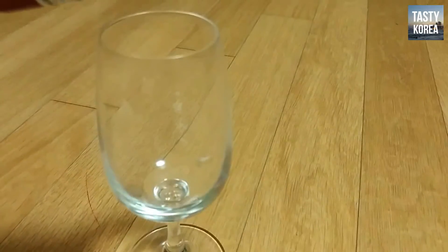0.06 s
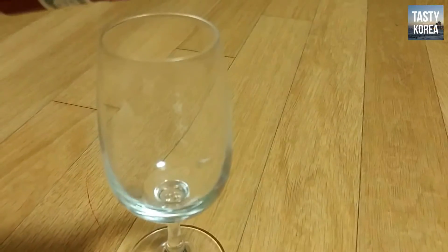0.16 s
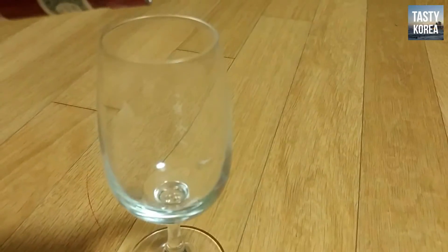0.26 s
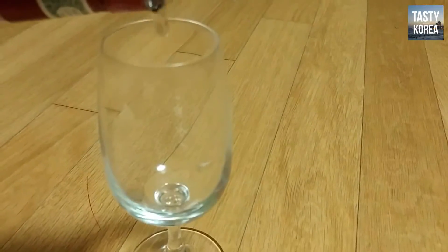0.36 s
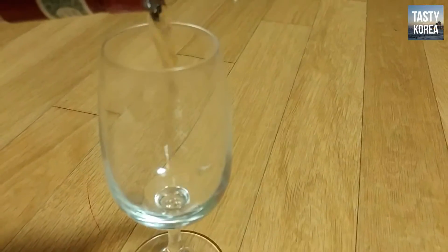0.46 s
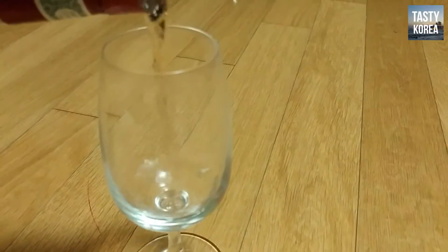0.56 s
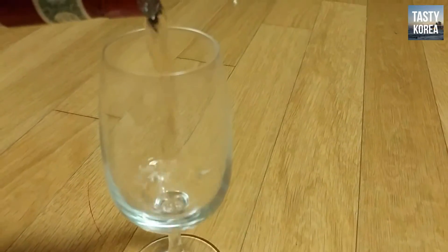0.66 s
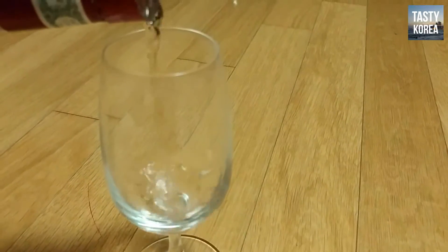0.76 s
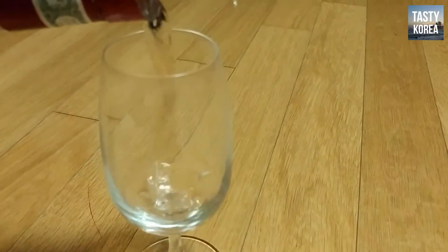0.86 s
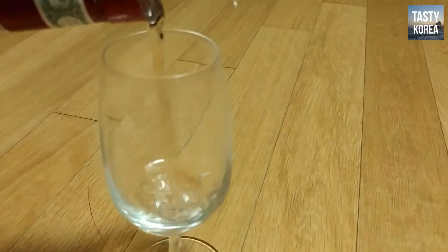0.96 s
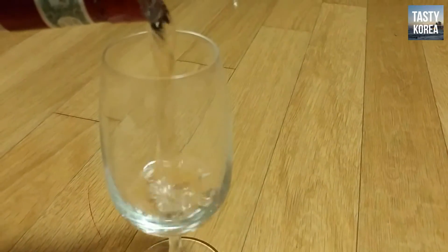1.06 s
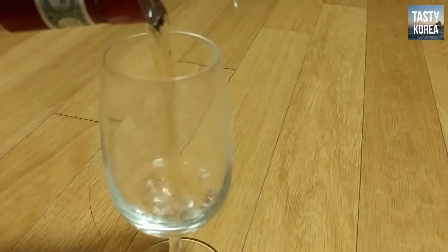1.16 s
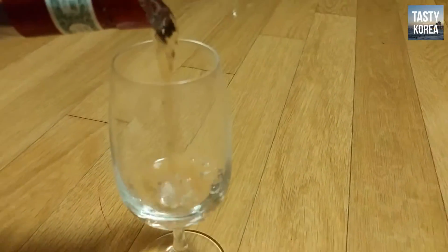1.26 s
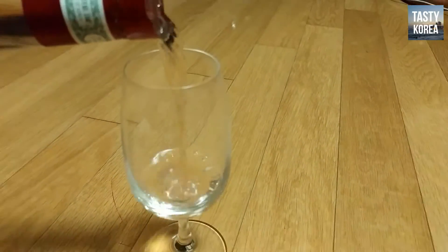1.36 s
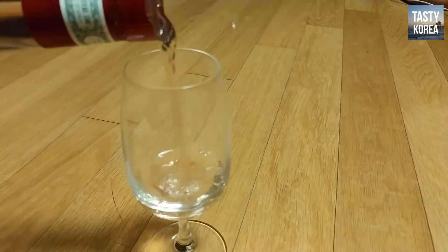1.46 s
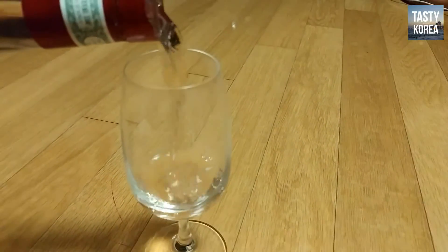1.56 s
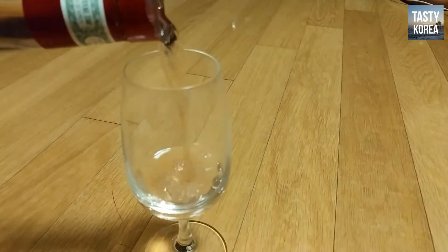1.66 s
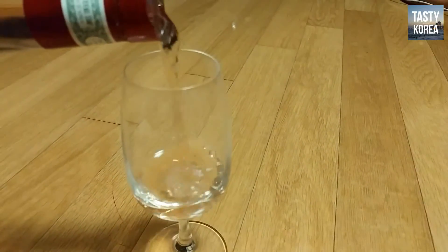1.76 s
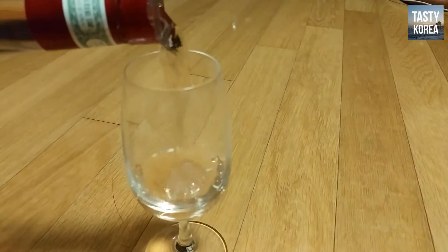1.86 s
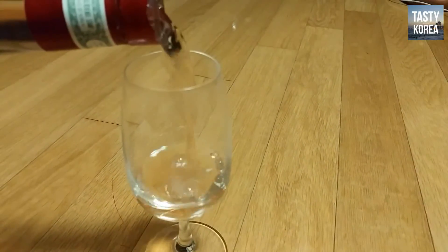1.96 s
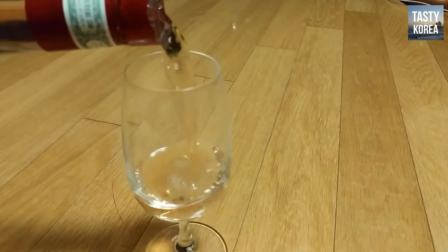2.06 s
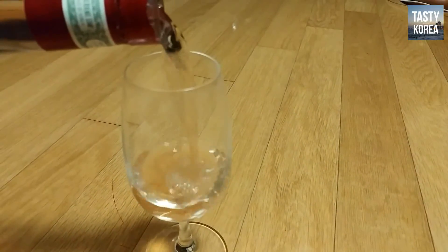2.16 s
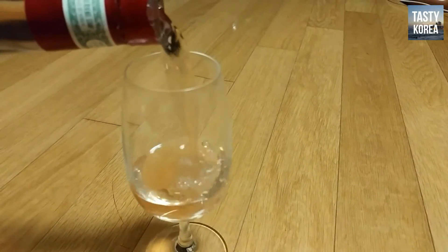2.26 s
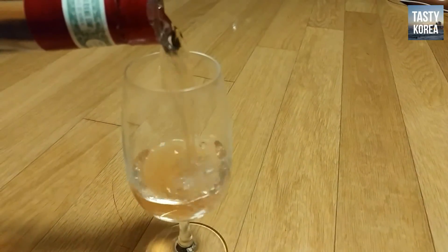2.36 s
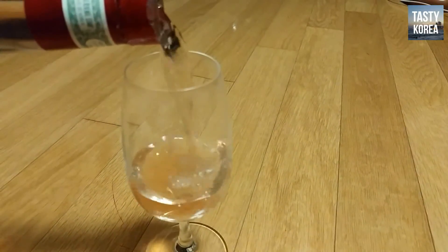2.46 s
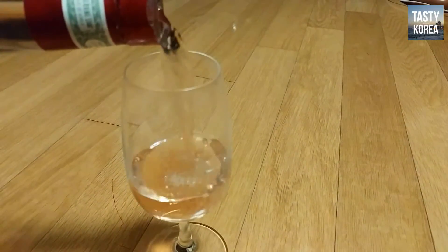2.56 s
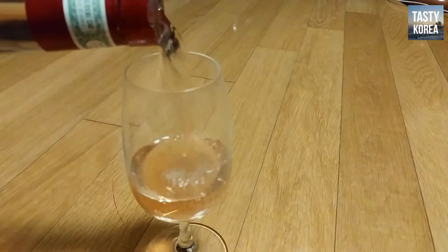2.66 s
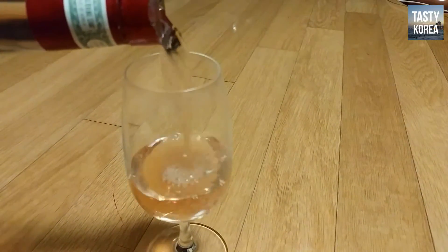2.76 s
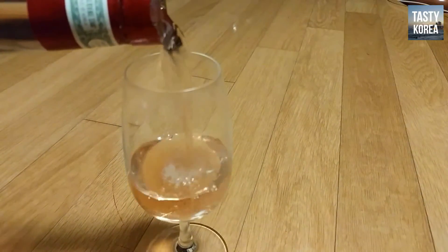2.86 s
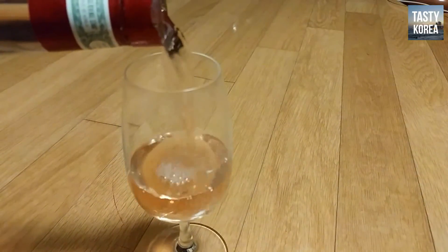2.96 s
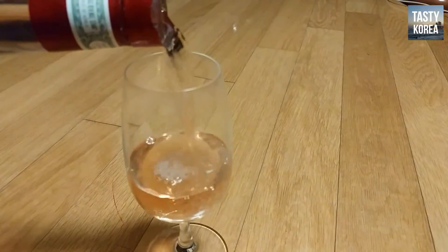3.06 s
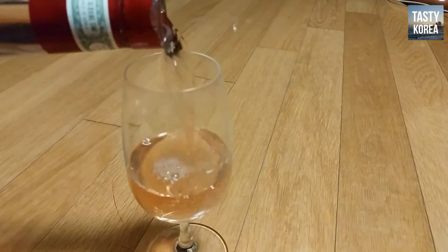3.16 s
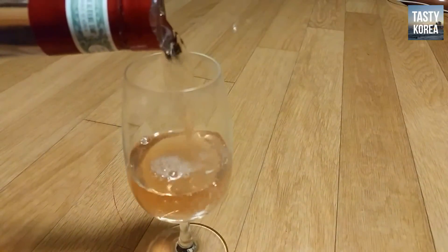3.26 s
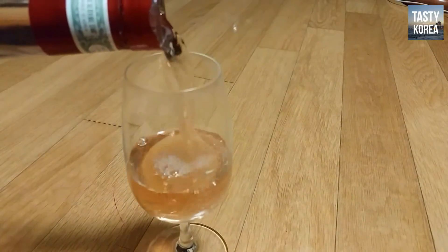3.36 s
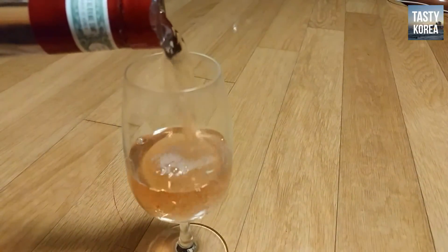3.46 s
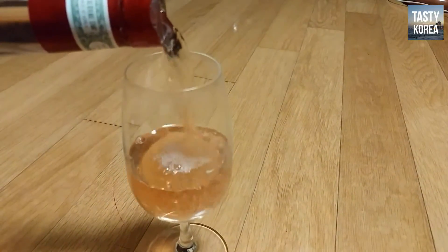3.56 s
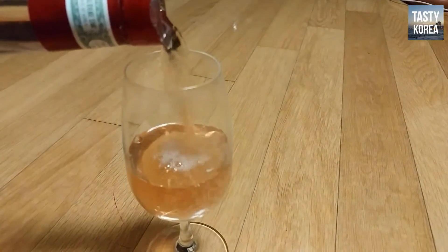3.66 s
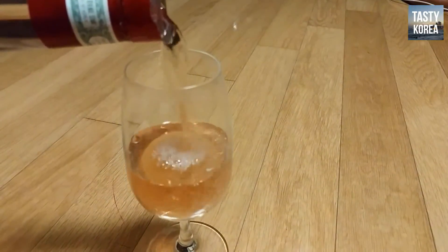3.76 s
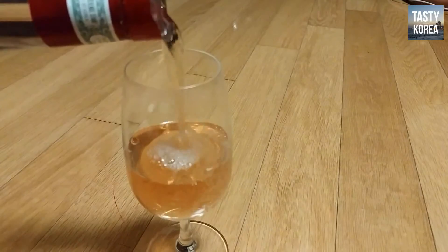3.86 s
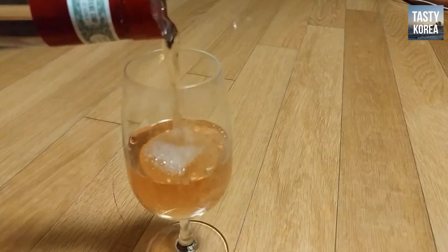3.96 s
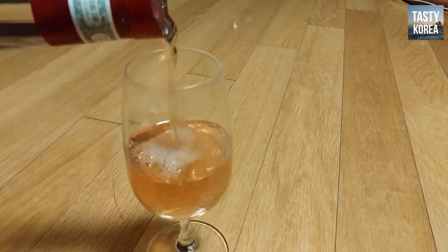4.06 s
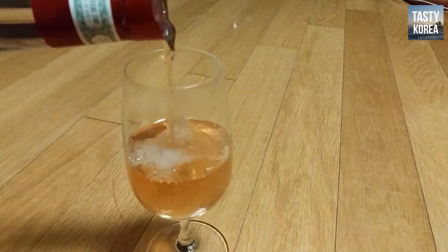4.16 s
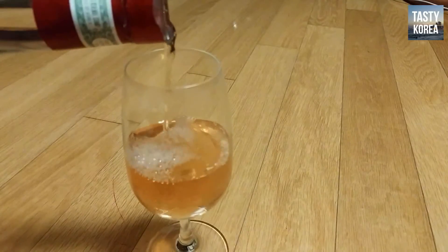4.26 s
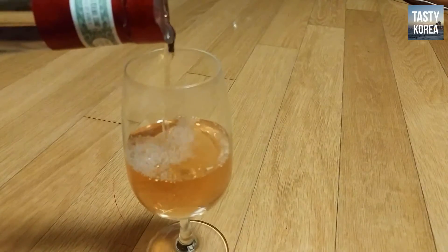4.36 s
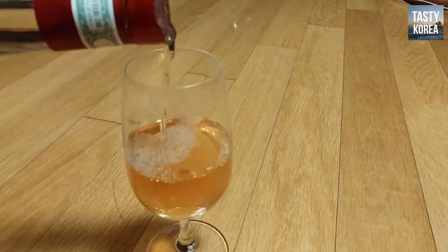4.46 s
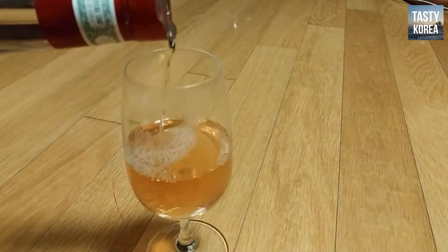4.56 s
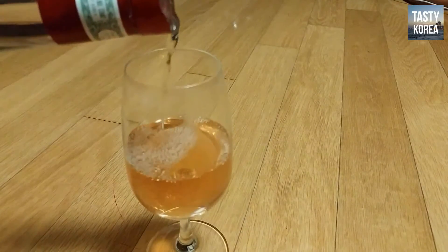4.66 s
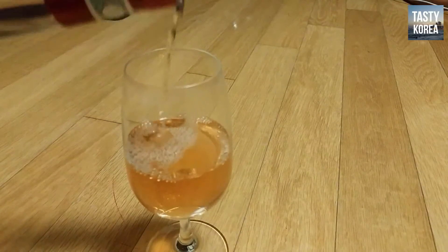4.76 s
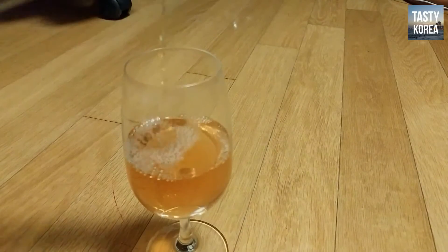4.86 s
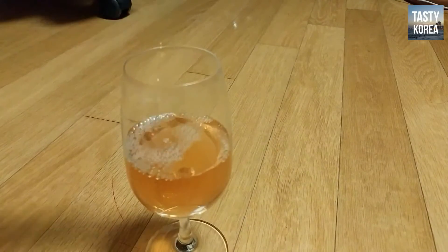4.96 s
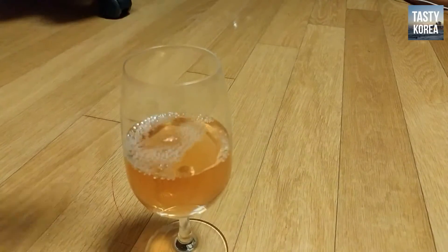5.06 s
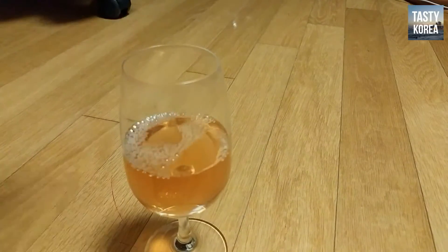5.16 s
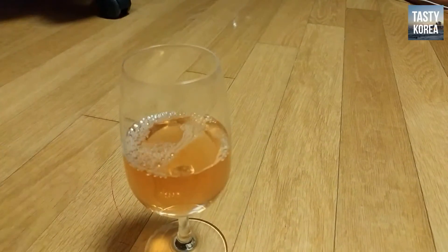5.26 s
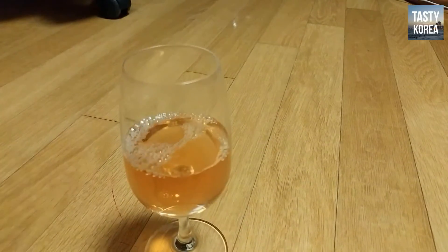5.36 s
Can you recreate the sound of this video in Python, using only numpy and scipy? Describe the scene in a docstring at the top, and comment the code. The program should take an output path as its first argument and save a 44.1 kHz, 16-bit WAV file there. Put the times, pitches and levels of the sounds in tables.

```python
"""Wine is poured from a bottle into a stemmed glass on a wooden floor in a quiet room.
The bottle glugs six times, its plucked air gliding up in pitch, while wine spatters on the bare glass (noise).
A steady stream then plops and fizzes in the pool: swelling sines, resonated clicks and crowds of tiny blips.
It thins to a trickle of drips and ends in a last gurgle as the bottle is raised.
Under it lie room murmur and microphone hiss (coloured noise). Table levels are before the mix gains."""
import sys
import numpy as np
from scipy import signal
from scipy.fft import rfft, irfft, next_fast_len
from scipy.io import wavfile
from scipy.ndimage import uniform_filter1d

SR = 44100
rng = np.random.default_rng(int(sys.argv[2]) if len(sys.argv) > 2 else 0)


def log_audio(samples):
    """Write samples as a 16-bit WAV file to the path given in sys.argv[1]."""
    # one column per channel
    frames = np.atleast_2d(samples).T
    # limit to full scale, then quantise
    limited = np.clip(frames, -1, 1)
    pcm = np.round(limited * 32767).astype(np.int16)
    wavfile.write(sys.argv[1], SR, pcm)


N = 238824
TIME = np.arange(N) / SR
AGE = np.arange(SR // 2) / SR  # time since an onset, s


# bottle glugs: [start_s, neck_clears_s, deepest_hz, opening_db, closing_swell_db]
GLUGS = [(.411, 0.603, 143.1, -37.5, -44), (.609, .79, 92, -37.5, -31.5),
         (0.821, 1.014, 73.4, -44.5, -35.5), (1.071, 1.245, 63.1, -51.5, -34.5),
         (1.325, 1.49, 61.55, -50, -33), (1.609, 1.757, 56.7, -55.5, -40.5)]
GLUG_T60_S, SWELL_RISE_S, SWELL_FALL_S = 0.84, 0.017, 0.0065
SWELL_LEAD_S = 0.0063  # the swell peaks just before the neck clears
OPEN_NECK_HZ = 300  # pitch with no wine in the neck
CLEARING_POWER = 1.47  # how the plug of wine runs out
NECK_CLEARING_S, CLEARING_LAW = 0.1, 0.46  # the deeper the glug, the faster its plug runs out


def glugs(edge_s, hoot_db, hoot_hz, hoot_s, rough, rough_s):
    """Bottle air springs on a shrinking plug of wine: pitch climbs, swells, and the open neck hoots."""
    out, shake = np.zeros(N), wander(rough_s)
    for start_s, clear_s, deep_hz, opening_db, swell_db in GLUGS:
        to_go_s = clear_s - start_s - AGE
        clearing_s = NECK_CLEARING_S * (deep_hz / OPEN_NECK_HZ) ** CLEARING_LAW
        plug = 1 - np.exp(-(np.maximum(to_go_s, 0) / clearing_s) ** CLEARING_POWER)
        # the moving mass, hence 1 / pitch squared, shrinks with the plug
        pitch_hz = (plug / deep_hz ** 2 + (1 - plug) / OPEN_NECK_HZ ** 2) ** -.5

        before_s = np.maximum(to_go_s - SWELL_LEAD_S, 0)
        after_s = np.maximum(SWELL_LEAD_S - to_go_s, 0)
        roughness = 1 + rough * shake[int(start_s * SR):][:len(AGE)]
        opening = from_db(opening_db - 60 * AGE / GLUG_T60_S) * roughness
        level = opening + from_db(swell_db) * np.exp(-before_s / SWELL_RISE_S)
        gate = np.minimum(AGE / edge_s, 1) * np.exp(-after_s / SWELL_FALL_S)
        add(out, start_s, gate * level * gliding_sine(pitch_hz))

        hoot = swell(AGE, hoot_s) * np.sin(2 * np.pi * hoot_hz * AGE)
        add(out, clear_s, from_db(swell_db + hoot_db) * hoot)
    return out


# air bubbles breaking into the bottle: [start_s, level_db, pitch_hz, t60_s]
GULPS = [(0.41, -22, 1076, 0.086), (0.6079, -19.5, 1028, 0.1), (0.825, -28.5, 1071, 0.074),
         (1.066, -33.5, 1095, 0.099), (1.609, -38.5, 1170, 0.065)]
# modes the bottle rings with: [pitch_hz, level_db, t60_s]
BOTTLE_MODES = [(735, -6, 0.032), (1020, -33, 0.17), (1214, -36, .09), (2760, -28.5, 0.027),
                (4565, -24.5, 0.018)]
# wine falling back leaves the bottle ringing: [start_s, level_db, pitch_hz, t60_s]
LAST_SLOSH = (5.095, -48, 1044, .8)


def bottle(sag, modes_db, attack_s):
    """Each swallowed bubble rings, sinking in pitch as it grows, and wakes the bottle's modes."""
    out, onset = np.zeros(N), 1 - np.exp(-AGE / attack_s)
    modes = sum(from_db(level_db) * bubble(pitch_hz, t60_s) for pitch_hz, level_db, t60_s in BOTTLE_MODES)
    body = from_db(modes_db) * modes
    for start_s, level_db, pitch_hz, t60_s in GULPS:
        gulp = bubble(pitch_hz, t60_s, glide=-sag, glide_s=0.065)
        add(out, start_s, from_db(level_db) * onset * (gulp + body))
    start_s, level_db, pitch_hz, t60_s = LAST_SLOSH
    add(out, start_s, from_db(level_db) * onset * bubble(pitch_hz, t60_s))
    return out


def neck_wash(wash_db, t60_s, low_hz, high_hz):
    """Wine washes over the neck as each bubble breaks in: decaying band noise."""
    out, band = np.zeros(N), signal.butter(2, [low_hz, high_hz], "band", fs=SR, output="sos")
    for start_s, level_db, *_ in GULPS:
        noise = signal.sosfilt(band, rng.standard_normal(len(AGE)))
        add(out, start_s, from_db(level_db + wash_db - 60 * AGE / t60_s) * noise)
    return out


# largest bubbles pinched off under the stream: [start_s, level_db, pitch_hz, swell_rise_s]
PLOPS = [(1.197, -22.5, 1010, 0.0015), (1.3195, -17, 896, 0.003), (1.3305, -19.5, 939, 0.0015),
         (1.5479, -31, 879, 0.0014), (1.5635, -28, 970, 0.0016), (1.7046, -34, 1190, 0.00065),
         (1.7123, -32, 1080, 0.00095), (1.7457, -28.5, 1070, .0015), (1.7664, -14, 985, 0.0017),
         (1.7756, -20, 842, 0.0044), (1.7932, -27, 958, 0.0013), (1.8384, -30, 1055, 0.0015),
         (1.9021, -17, 915, 0.0042), (1.9474, -27, 876, 0.0021), (1.978, -20.5, 1120, 0.0013),
         (2.039, -19, 972, .0026), (2.0745, -19, 858, 0.0058), (2.0936, -22, 894, 0.0023),
         (2.1658, -21, 925, 0.004), (2.2024, -20, 880, 0.0056), (2.2321, -10, 858, 0.005),
         (2.284, -6, 864, 0.0039), (2.3279, -9.5, 840, 0.007), (2.3867, -16.5, 890, 0.0044),
         (2.408, -20, 846, .006), (2.4381, -15, 905, 0.0043), (2.4611, -14, 870, 0.0044),
         (2.4817, -13.5, 833, 0.0038), (2.56, -18, 847, 0.0029), (2.6188, -20.5, 894, .0049),
         (2.7153, -19, 885, 0.0077), (2.7927, -26, 880, 0.0021), (2.999, -31.5, 880, 0.0022),
         (3.1503, -27.5, 939, 0.00047), (3.2648, -28.5, 1130, 0.00096), (3.4436, -34, 1200, 0.0025),
         (3.527, -26.5, 994, 0.0075), (3.5812, -21, 1028, 0.0035), (3.6609, -21, 1052, 0.0029),
         (3.684, -26.5, 1040, 0.0036), (3.7523, -25.5, 1120, .0027), (3.7786, -27, 1062, 0.0034),
         (3.8071, -27.5, 1074, 0.0028), (3.8683, -30.5, 1093, 0.0037), (3.9806, -28.5, 1054, 0.0047),
         (4.0094, -21.5, 1054, 0.0042), (4.1, -24.5, 1020, .0036), (4.1347, -32, 1090, 0.0045),
         (4.1716, -30, 1071, 0.0045), (4.181, -30, 1040, 0.0058), (4.2413, -30.5, 1087, 0.0049),
         (5.0218, -24.5, 1027, .0039), (5.0368, -27, 1100, 0.0032), (5.0692, -18, 1110, 0.0037),
         (5.0926, -9.5, 1089, 0.0033), (5.1066, -21.5, 1081, 0.0055)]
# resonances as the glass fills: [time_s, gurgle_hz, deep_gurgle_hz, patter_hz]
FILL = [(.9, 780, 606, 2670), (1.8, 839, 569, 2744), (2.4, 870, 569, 2865), (3.05, 902, 476, 2950),
        (3.6, 1067, 410, 3820), (4.3, 1113, 423, 3657), (4.9, 1027, 536, 2634), (5.3, 1070, 517, 2754)]


def plops(snap_db, snap_s, ring_db, ring_t60_s, damping_db_per_s):
    """Large bubbles swell and die in a few cycles; pinch-off snaps, glass air rings, less as it fills."""
    out = np.zeros(N)
    fill_s, gurgle_hz = np.transpose(FILL)[:2]
    for start_s, level_db, pitch_hz, rise_s in PLOPS:
        shape = swell(AGE, rise_s) + from_db(snap_db) * swell(AGE, snap_s)
        plop = shape * np.sin(2 * np.pi * pitch_hz * AGE)
        air = bubble(np.interp(start_s, fill_s, gurgle_hz), ring_t60_s) * (1 - np.exp(-AGE / 0.011))
        air_db = ring_db - damping_db_per_s * (start_s - PLOPS[0][0])
        add(out, start_s, from_db(level_db) * (plop + from_db(air_db) * air))
    return out


# drops landing in the pool: [start_s, level_db]
DRIPS = [(4.353, -46.5), (4.523, -54), (4.709, -53.5), (4.724, -49), (4.906, -50.5), (4.938, -46),
         (5.002, -52)]
# wet smack of a drop or bubble on the surface: [freq_hz, gain_db]
SMACK = [(50, 0.5), (120, -0.5), (280, -6), (450, 0), (650, 7.5), (1400, 6.5), (2100, -7), (3800, -5.5),
         (6000, -14.5), (12000, -21)]


def smacks(follow, plop_db, rise_s):
    """Every drip and plop tears the surface in a noise burst; bigger plops smack a little harder."""
    out = np.zeros(N)
    plop_smacks = [(start_s, plop_db + follow * level_db) for start_s, level_db, *_ in PLOPS]
    for start_s, level_db in list(DRIPS) + plop_smacks:
        add(out, start_s, from_db(level_db) * swell(AGE, rise_s) * rng.standard_normal(len(AGE)))
    return coloured(out, SMACK)


# separate gushes during the glugs: [start_s, length_s, gurgle_db, deep_gurgle_db, spray_db]
GUSHES = [(0.917, 0.078, -63, -71, -51), (1.085, 0.051, -86, -80, -57), (1.183, 0.053, -46, -68, -52),
          (1.302, 0.041, -45, -54, -56), (1.406, .13, -55.5, -60, -52.5), (1.62, .15, -43, -55.5, -47)]
GUSH_ATTACK_S, GUSH_T60_S = .022, .22
# unbroken stream, thinning to a trickle: [time_s, gurgle_db, deep_gurgle_db, spray_db]
STREAM = [(1.82, -65, -76, -59), (1.92, -29, -57, -50), (2.0, -39, -55, -51), (2.08, -33.5, -44.5, -57),
          (2.15, -36, -61, -59.5), (2.28, -25, -47.5, -51), (2.47, -25.5, -46, -52),
          (2.6, -35.5, -55, -54.5), (2.78, -29.5, -46, -52.5), (2.92, -42, -54, -60), (3.03, -29, -42, -53),
          (3.12, -41, -47, -60), (3.25, -35.5, -48.5, -55), (3.4, -48.5, -54.5, -63), (3.8, -40, -54, -57),
          (4.24, -41.5, -61.5, -58), (4.46, -70.5, -88, -76.5), (4.87, -84.5, -94.5, -80)]
# last gurgle as the bottle is raised: [time_s, gurgle_db, deep_gurgle_db, spray_db]
LAST_GURGLE = [(4.89, -72.5, -88, -70), (4.94, -57, -56, -63), (5.0, -45.5, -67, -58),
               (5.089, -27.5, -46, -56), (5.199, -68, -74, -63), (5.32, -86, -84, -79)]
DRIP_SPRAY_DB, DRIP_T60_S = -9.5, .16  # each drop throws up a little spray


def flow():
    """Strength of gurgle, deep gurgle and spray: gushes, drips, the stream and the last gurgle."""
    out = np.zeros((3, N))
    for start_s, length_s, *levels_db in GUSHES:
        release = from_db(-60 * np.maximum(AGE - length_s, 0) / GUSH_T60_S)
        shape = np.minimum(AGE / GUSH_ATTACK_S, 1) * release
        add(out, start_s, from_db(levels_db)[:, None] * shape)
    for start_s, level_db in DRIPS:
        add(out[2], start_s, from_db(level_db + DRIP_SPRAY_DB - 60 * AGE / DRIP_T60_S))
    for rows in (STREAM, LAST_GURGLE):
        out += from_db(in_time(rows)) * (TIME > rows[0][0]) * (TIME < rows[-1][0])
    return out


def gurgle(centre_hz, width_hz, per_s, spread_db):
    """A crowd of lesser bubbles (clicks) sounds through one doubled resonance of the filling glass."""
    once = resonance(impacts(per_s, spread_db), centre_hz, width_hz)
    return evened(resonance(once, centre_hz, width_hz), span_s=0.055)


# clearest small ringing bubbles: [start_s, level_db, pitch_hz, t60_s, left_minus_right_db]
PINGS = [(.975, -36.5, 2724, 0.062, 11), (1.201, -22.5, 7140, 0.046, 17), (1.203, -28, 7660, 0.054, 13),
         (1.3012, -21.5, 2585, 0.024, 0), (1.4235, -25.5, 2735, 0.022, 1), (1.496, -20, 2770, .023, 0),
         (1.655, -25.5, 2720, 0.024, 2), (1.673, -32.5, 1600, 0.015, -6), (1.684, -27, 1490, 0.024, 1),
         (1.705, -33, 1500, .03, -1), (1.734, -31, 1340, 0.026, 1), (1.8683, -23.5, 6660, 0.024, 10.5),
         (1.891, -24, 2770, 0.012, 0), (1.9444, -21, 7890, 0.015, 8.5), (2.0227, -23.5, 2880, 0.027, -0.5),
         (2.0716, -25, 2780, .023, 1), (2.2243, -26.5, 6520, 0.021, 9.5), (3.037, -28.5, 3460, 0.012, 2),
         (4.938, -36.5, 1390, 0.032, 0), (5.022, -43, 3720, 0.032, 2), (5.061, -35.5, 4076, 0.025, 3),
         (5.118, -39, 3980, .025, 1.5), (5.176, -39, 1345, 0.025, -1)]
# bubble racing to the surface: [start_s, level_db, first_hz, last_hz, swell_rise_s]
CHIRP = (1.201, -31, 1150, 1950, .006)


def pings(rise, rough, attack_s):
    """Small bubbles ring, shaken by the moving wine, and rise in pitch near the surface."""
    out = np.zeros((2, N))
    for start_s, level_db, pitch_hz, t60_s, pan_db in PINGS:
        shake = rms_one(uniform_filter1d(rng.standard_normal(len(AGE)), size=70))
        onset = 1 - np.exp(-AGE / attack_s)
        ring = bubble(pitch_hz, t60_s, glide=rise) * (1 + rough * shake) * onset
        add(out, start_s, panned(from_db(level_db) * ring, pan_db))
    start_s, level_db, first_hz, last_hz, rise_s = CHIRP
    pitch_hz = last_hz + (first_hz - last_hz) * np.exp(-AGE / rise_s)
    add(out, start_s, from_db(level_db) * swell(AGE, rise_s) * gliding_sine(pitch_hz))
    return out


def lesser_pings(strength, per_s, low_hz, high_hz, cycles, spread_db, scatter_db, rise, size=2600):
    """A crowd of fainter bubbles rings at random, each with its own pitch and place."""
    out, age_s = np.zeros((2, N + size)), np.arange(size) / SR
    for when, pitch, weakness, place in rng.random((int(per_s * N / SR), 4)):
        i, pitch_hz = int(when * N), low_hz * (high_hz / low_hz) ** pitch
        turns = pitch_hz * age_s
        shape = np.minimum(turns / 2, 1) * from_db(-60 * turns / cycles)
        ring = np.sin(2 * np.pi * turns * (1 + rise * turns / cycles)) * shape
        level = strength[i] * from_db(-spread_db * weakness)
        out[:, i:i + size] += panned(level * ring, scatter_db * (2 * place - 1))
    return out[:, :N]


def droplets(level_db, per_s, spread_db, cycles, scatter_db, mist_db, ticks_db, clump_db, clump_s, size=600):
    """Tiny bubbles of random pitch and place burst in clumps; dry ticks and fine mist lie under them."""
    out, age_s = np.zeros((2, N + size)), np.arange(size) / SR
    # fewer burst where the spray is weak
    chance = per_s * from_db(.25 * (level_db - level_db.max())) / SR
    born = np.flatnonzero(rng.random(N) < chance)
    for i, (pitch, strength, length, place) in zip(born, rng.random((len(born), 4))):
        pitch_hz = 1500 * 10 ** pitch ** .7
        rise_s = min(cycles * 3 ** length / pitch_hz, .002)
        blip = swell(age_s, rise_s) * np.sin(2 * np.pi * pitch_hz * age_s)
        level = from_db(-spread_db * np.log(strength + 0.061))
        out[:, i:i + size] += panned(level * blip, scatter_db * (2 * place - 1))
    ticks = from_db(ticks_db) * rms_one(impacts(per_s=430, spread_db=-0.5))
    mist = from_db(mist_db) * rng.standard_normal((2, N))
    crackle = evened(out[:, :N], span_s=0.3) + ticks + mist
    return evened(crackle * from_db(clump_db * wander(clump_s)), span_s=0.056)


# biggest drops slapping the glass: [start_s, level_db]
SPITS = [(1.205, -27.5), (1.258, -36.5), (1.301, -35), (1.351, -35), (1.5105, -36.5), (1.628, -46),
         (1.7125, -42.5), (1.901, -35.5), (1.9375, -29.5), (2.0233, -29), (2.0667, -35), (2.3875, -38.5),
         (2.7653, -38.5), (2.867, -38.5), (2.826, -31.5), (3.037, -32), (3.4426, -42.5), (4.0093, -37),
         (4.062, -45.5), (4.116, -48.5), (4.173, -44), (4.236, -44), (4.277, -49)]
SPIT_T60_S = 0.018


def spits(tail_db, apart, plain_db):
    """A drop slaps the glass: a sharp noise crack with a colour of its own, and a brief scatter."""
    out = np.zeros((2, N))
    shape = from_db(-60 * AGE / SPIT_T60_S) + from_db(tail_db) * from_db(-60 * AGE / 0.16)
    for start_s, level_db in SPITS:
        noise = rng.standard_normal(len(AGE)) + apart * rng.standard_normal((2, len(AGE)))
        centre_hz = rng.uniform(7000, 13000)
        band = signal.butter(1, [centre_hz - 1200, centre_hz + 1200], "band", fs=SR, output="sos")
        crack = rms_one(signal.sosfilt(band, noise)) + from_db(plain_db) * noise
        add(out, start_s, from_db(level_db) * crack * shape)
    return out


# spray as each microphone hears it: [freq_hz, gain_db]
SPRAY_LEFT = [(400, -50), (1400, -12.5), (2050, -7), (3500, -2), (4500, -1), (6000, -0.5), (8000, 9.5),
              (9100, -7), (10500, -4.5), (13000, -6.5), (15500, -10)]
SPRAY_RIGHT = [(400, -8.5), (1400, -2), (2050, -9.5), (3900, -1), (5500, -2.5), (6600, 0), (8200, -7),
               (9050, -21), (10000, 6), (10850, 14), (11600, 5.5), (13000, 0), (15500, -9.5)]


def spray_at_microphones(spray):
    """Each microphone hears the spray through its own spectrum."""
    return np.array([coloured(spray[0], SPRAY_LEFT), coloured(spray[1], SPRAY_RIGHT)])


# stream drumming on the glass and the boards under it: [freq_hz, gain_db]
DRUMMING = [(30, -7), (70, 1), (130, -1), (260, -3), (400, -12.5), (900, -27)]


def drumming(gurgling):
    """The stream drums on glass and boards: low noise that follows the gurgle, with less contrast."""
    return gurgling ** 0.62 * coloured(rng.standard_normal(N), DRUMMING)


ROOM_T60_S = 0.2


def room(x, wet_db, apart):
    """A short diffuse tail of decaying noise, partly shared by the two microphones."""
    noise = rng.standard_normal(len(AGE)) + apart * rng.standard_normal((2, len(AGE)))
    tail = noise * from_db(-60 * AGE / ROOM_T60_S) * (1 - np.exp(-AGE / 0.0016))
    tail /= np.sqrt(np.sum(tail ** 2, axis=1, keepdims=True))
    return x + from_db(wet_db) * signal.fftconvolve(x, tail, axes=1)[:, :N]


# room murmur and microphone hiss: [freq_hz, density_db_per_hz]
FLOOR_LEFT = [(25, -104), (60, -100), (200, -100), (370, -107), (550, -100), (900, -109), (1600, -117),
              (6500, -119), (7800, -114), (9000, -125), (10700, -116), (12000, -121), (15500, -130)]
FLOOR_RIGHT = [(25, -104), (60, -100), (200, -100), (370, -107), (550, -100), (900, -109), (1600, -117),
               (6000, -117), (7800, -107), (9000, -126), (10000, -101), (10650, -86), (11600, -109),
               (15500, -130)]
# thin line in the right hiss: [pitch_hz, level_db]
HISS_WHISTLE = (7800, -76)


def floor():
    """Room murmur common to both microphones, and each one's own hiss."""
    shared, *own = rng.standard_normal((3, N))
    low, high = (signal.butter(2, 1500, kind, fs=SR, output="sos") for kind in ("low", "high"))
    murmur = signal.sosfilt(low, shared)
    left, right = np.sqrt(SR / 2) * (murmur + signal.sosfilt(high, own))  # unit density per Hz
    whistle_hz, whistle_db = HISS_WHISTLE
    whistle = from_db(whistle_db) * rms_one(resonance(own[1], np.full(N, whistle_hz), width_hz=26.4))
    return np.array([coloured(left, FLOOR_LEFT), coloured(right, FLOOR_RIGHT) + whistle])


def from_db(db):
    """Decibels to amplitude."""
    return 10 ** (np.asarray(db) / 20)


def rms_one(x):
    """Scale to RMS 1."""
    return x / np.sqrt(np.mean(x ** 2) + 1e-20)


def in_time(rows):
    """Each column of a curve, sample by sample."""
    time_s, *columns = np.transpose(rows)
    return [np.interp(TIME, time_s, column) for column in columns]


def add(track, start_s, sound):
    """Lay a sound into a track at a time."""
    i = int(start_s * SR)
    track[..., i:i + len(AGE)] += sound[..., :N - i]


def panned(x, pan_db):
    """Stereo with left over right by pan_db."""
    return x * from_db(np.array([[.5], [-.5]]) * pan_db)


def gliding_sine(pitch_hz):
    """Sine whose phase sums a pitch curve."""
    return np.sin(2 * np.pi * np.cumsum(pitch_hz) / SR)


def bubble(pitch_hz, t60_s, glide=0., glide_s=0.043):
    """A dying sine whose pitch slides by a share of itself."""
    curve_hz = pitch_hz * (1 + glide * (1 - np.exp(-AGE / glide_s)))
    return gliding_sine(curve_hz) * from_db(-60 * AGE / max(t60_s, 1e-3))


def swell(age_s, rise_s):
    """A rounded rise to 1 and a fall that is nearly as quick."""
    u = age_s / max(rise_s, 1e-5)
    return (u * np.exp(1 - u)) ** 2


def wander(span_s):
    """A random swing of RMS 1, smoothed over a span."""
    return rms_one(signal.fftconvolve(rng.standard_normal(N), swell(AGE, span_s))[:N])


def impacts(per_s, spread_db):
    """Random clicks of uneven size and either sign."""
    sizes = from_db(spread_db * np.minimum(rng.exponential(1, N), 4))
    return (rng.random(N) < per_s / SR) * sizes * rng.choice([-1, 1], N)


def evened(x, span_s):
    """Level near 1 over each short span; the grain inside it stays."""
    power = uniform_filter1d(np.mean(np.atleast_2d(x) ** 2, axis=0), int(span_s * SR))
    return x / np.sqrt(np.abs(power) + np.mean(x ** 2) / 100)


def resonance(x, centre_hz, width_hz, size=128):
    """A two-pole resonance whose centre follows a curve, block by block."""
    r, out, state = np.exp(-np.pi * width_hz / SR), np.zeros(N), np.zeros(2)
    for i in range(0, N, size):
        a = [1, -2 * r * np.cos(2 * np.pi * centre_hz[i] / SR), r * r]
        out[i:i + size], state = signal.lfilter([1 - r, 0, r - 1], a, x[i:i + size] + 1e-18, zi=state)
    return out


def coloured(x, spectrum):
    """Causal (minimum-phase) filter with the given spectrum, by folding the cepstrum."""
    size = next_fast_len(N + SR // 2)
    freq_hz, gain_db = np.transpose(spectrum)
    grid_hz = np.arange(size // 2 + 1) * SR / size
    grid_db = np.interp(np.log(grid_hz + 1), np.log(freq_hz), gain_db)
    cepstrum = irfft(np.log(from_db(grid_db)), size)
    cepstrum[1:size // 2] *= 2
    cepstrum[size // 2 + 1:] = 0
    return irfft(rfft(x, size) * np.exp(rfft(cepstrum)), size)[:N]


# stream wandering across the glass: [time_s, pool_left_minus_right_db, spray_left_minus_right_db]
PLACE = [(1.2, -0.5, -2), (1.9, -0.5, 1), (2.4, -1, 0.5), (3.1, -1.5, -4.5), (3.8, 2.5, -4), (5.1, 0.9, -3)]
# patter on the bare glass, fading as the pool deepens: [time_s, gain_re_spray_db]
PATTER = [(.95, 0.5), (1.3, 6.5), (1.8, 0), (2.5, 0), (3.4, -6), (5.1, -16)]
# background coming up at first: [time_s, gain_db]
FLOOR_RISE = [(.3, 0), (.7, 3)]


def scene():
    """Bottle, pool and spray, each with its room tail, over the background."""
    gurgling, deep_gurgling, spraying = flow()
    spray_db = 20 * np.log10(spraying + 1e-6)
    gurgle_hz, deep_hz, patter_hz = in_time(FILL)
    pool_pan_db, spray_pan_db = in_time(PLACE)
    (patter_db,), (floor_db,) = in_time(PATTER), in_time(FLOOR_RISE)

    neck = from_db(2) * glugs(edge_s=0.0013, hoot_db=-9.5, hoot_hz=257, hoot_s=0.012,
                              rough=0.22, rough_s=0.0018)
    neck += bottle(sag=0.107, modes_db=2.0, attack_s=0.0012)
    neck += neck_wash(wash_db=-33, t60_s=0.4, low_hz=280, high_hz=3500)

    pool = from_db(-1.7) * plops(snap_db=-10.5, snap_s=0.00078, ring_db=-13.5, ring_t60_s=0.14,
                                 damping_db_per_s=14)
    pool += from_db(-6) * gurgling * gurgle(gurgle_hz, width_hz=154, per_s=250, spread_db=3.0)
    pool += smacks(follow=0.42, plop_db=-33.0, rise_s=0.0044)
    deep = from_db(-6) * deep_gurgling * gurgle(deep_hz, width_hz=82, per_s=150, spread_db=4.0)
    churn = from_db(12) * lesser_pings(deep_gurgling, per_s=170, low_hz=610, high_hz=1600, cycles=15,
                                       spread_db=10, scatter_db=13, rise=0.067)
    lows = panned(pool, pool_pan_db) + panned(deep, 3.4) + churn + from_db(-24) * drumming(gurgling)

    unsteady_hz = patter_hz * (1 + 0.061 * wander(span_s=.012))
    patter = gurgle(unsteady_hz, width_hz=234, per_s=260, spread_db=3.5)
    patter *= from_db(patter_db - 1.5) * spraying
    fizz = droplets(spray_db, per_s=2400, spread_db=5.5, cycles=3.6, scatter_db=19.5, mist_db=-9,
                    ticks_db=-1, clump_db=5.0, clump_s=0.0036)
    spray = from_db(3.0) * spraying * fizz
    spray += from_db(-1.0) * spits(tail_db=-29.0, apart=1.0, plain_db=-2.5)
    splash = spray_at_microphones(panned(spray, spray_pan_db))
    splash += panned(patter, 1.6) + pings(rise=0.054, rough=0.39, attack_s=0.00051)
    splash += from_db(8.5) * lesser_pings(spraying, per_s=180, low_hz=3290, high_hz=4500, cycles=20,
                                          spread_db=17.5, scatter_db=6, rise=.02)
    high_pings = lesser_pings(spraying * from_db(patter_db), per_s=78, low_hz=4800, high_hz=8400,
                              cycles=120, spread_db=17, scatter_db=9, rise=.01)
    splash += panned(from_db(18) * high_pings, 4)

    wet = room(panned(neck, 0.35), wet_db=-8.5, apart=0.49)
    wet += room(lows, wet_db=-6.5, apart=0.93)
    wet += room(splash, wet_db=-8, apart=6.0)
    return wet + from_db(floor_db) * floor()


CUTOFF_HZ = 15700


def record(dry):
    """The left microphone lies a little farther away; the deepest bass and the top are cut."""
    delayed_left = np.concatenate([np.zeros(3), dry[0, :-3]])
    spaced = np.array([delayed_left, dry[1]])
    thinned = signal.sosfilt(signal.butter(1, 30, "high", fs=SR, output="sos"), spaced)
    return signal.sosfilt(signal.ellip(10, .1, 80, CUTOFF_HZ, fs=SR, output="sos"), thinned)


dry = scene()
out = record(dry)
log_audio(out)
```